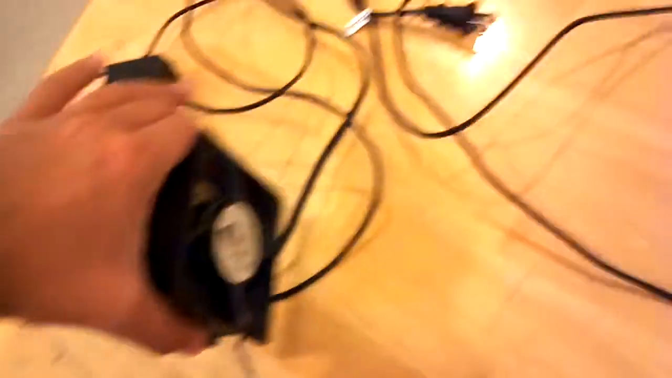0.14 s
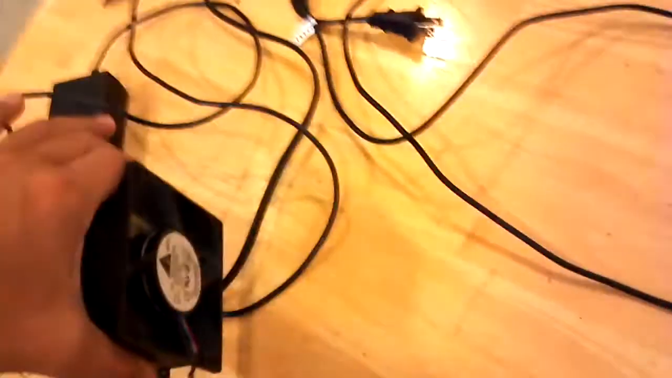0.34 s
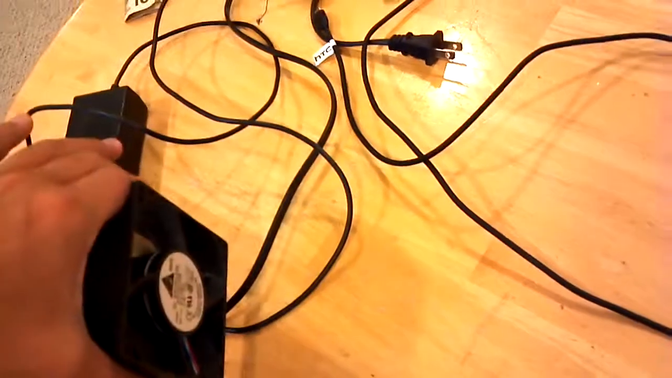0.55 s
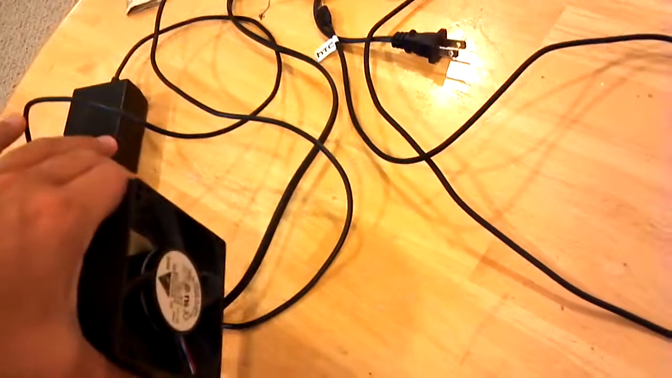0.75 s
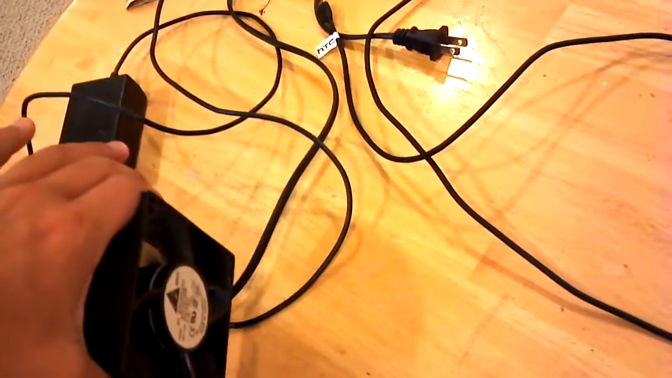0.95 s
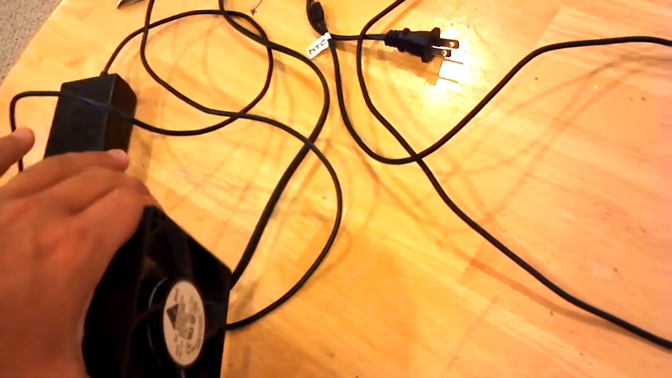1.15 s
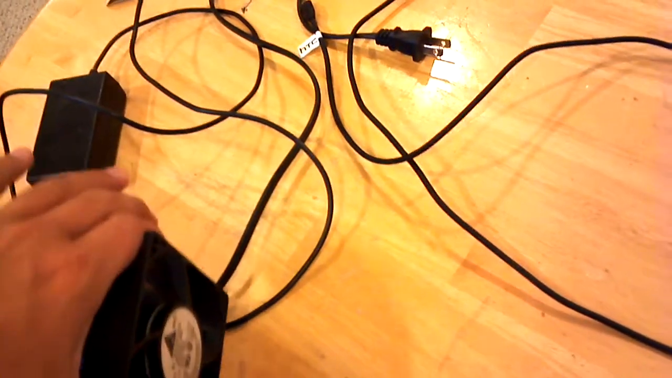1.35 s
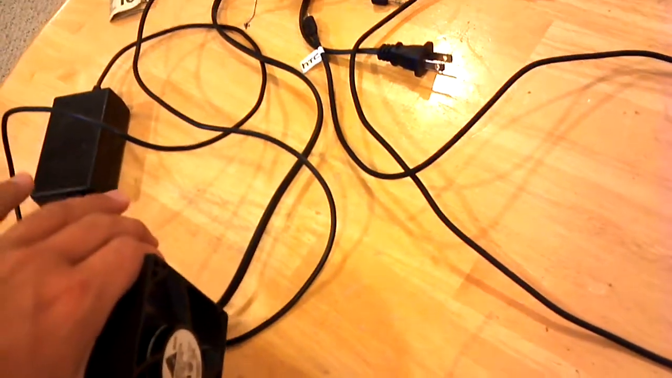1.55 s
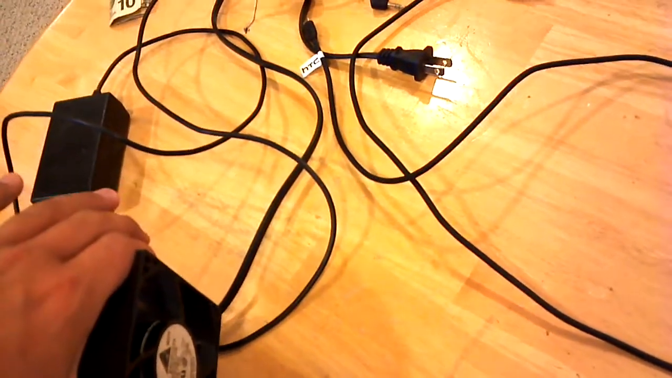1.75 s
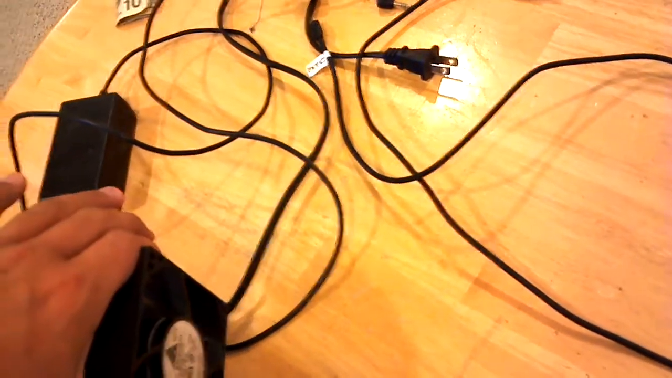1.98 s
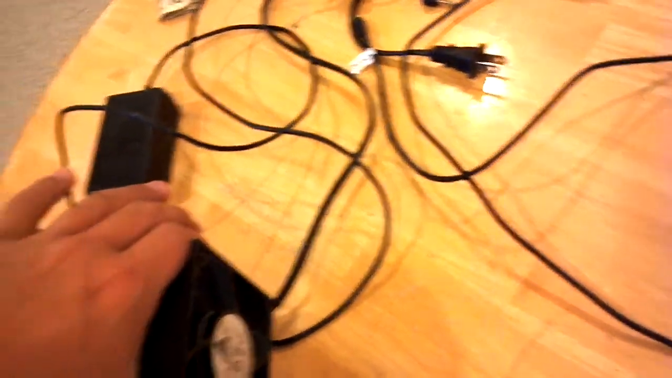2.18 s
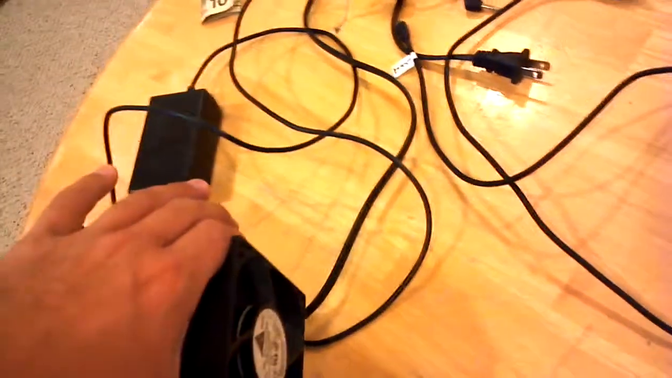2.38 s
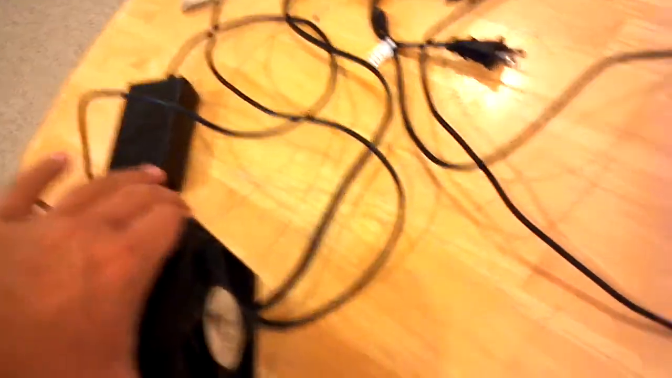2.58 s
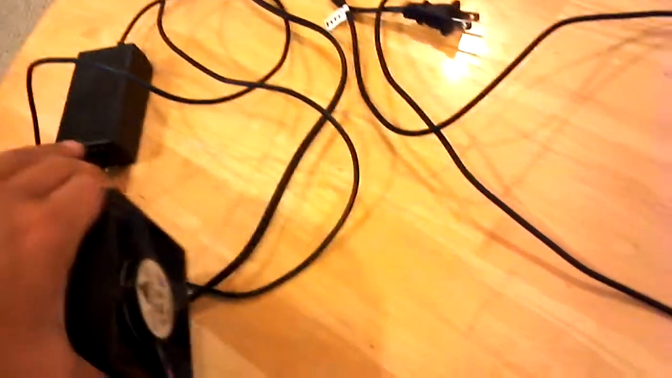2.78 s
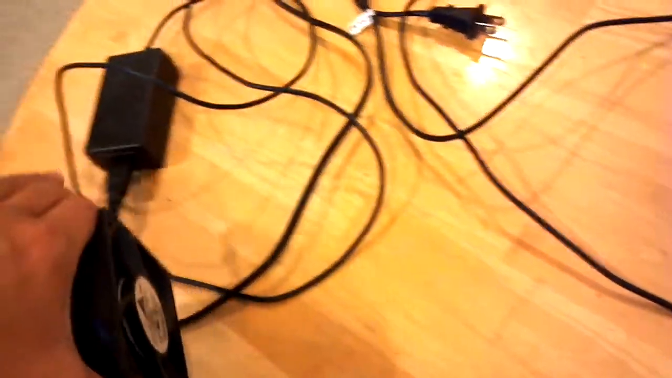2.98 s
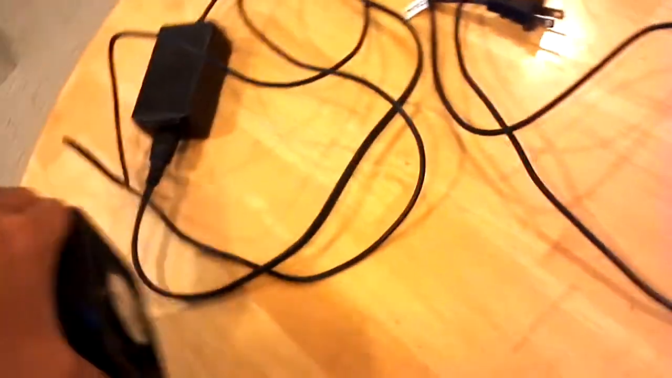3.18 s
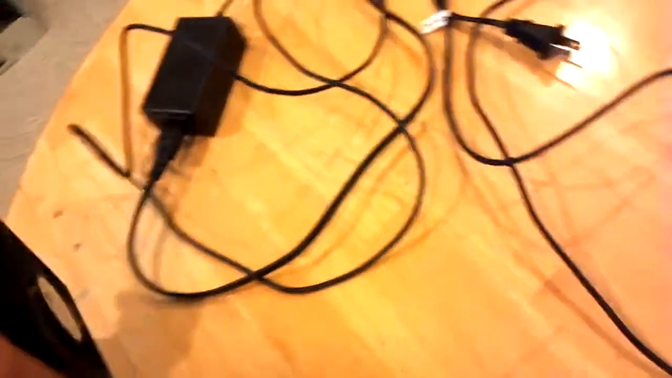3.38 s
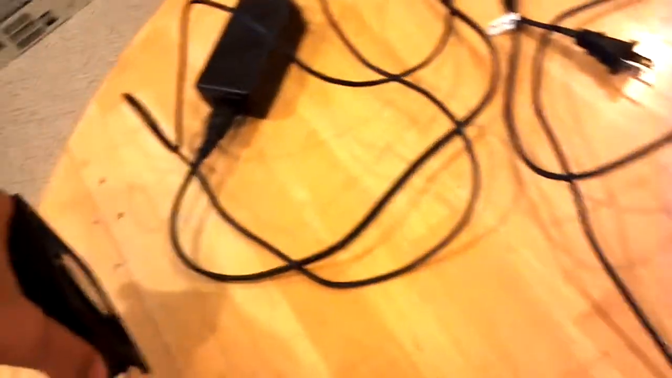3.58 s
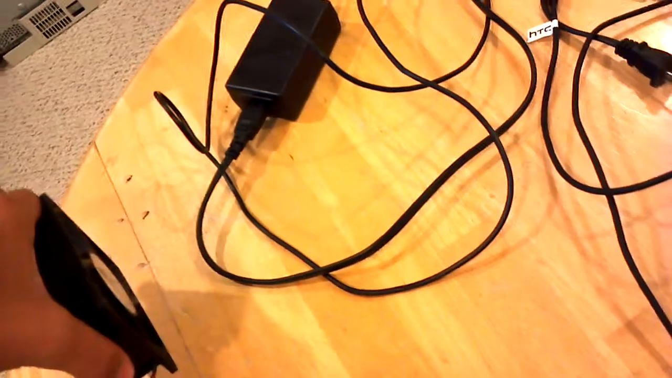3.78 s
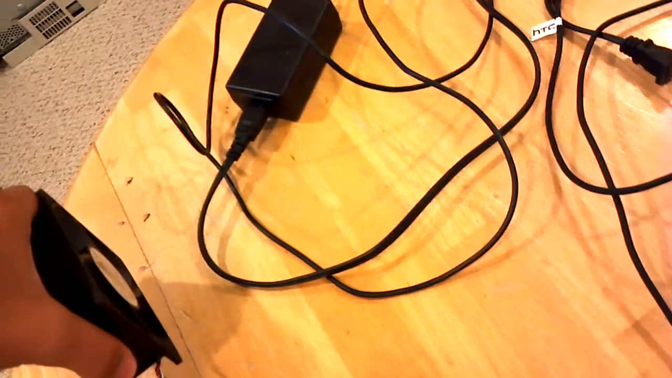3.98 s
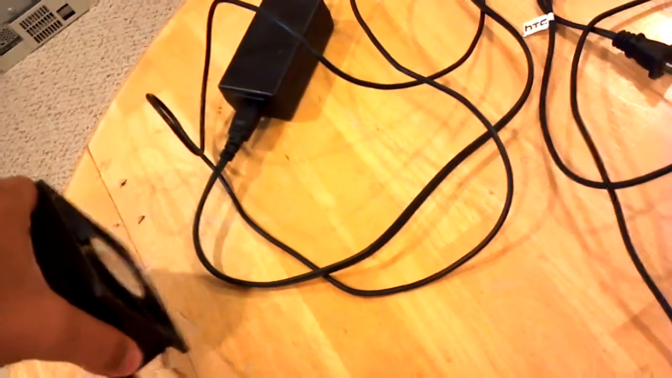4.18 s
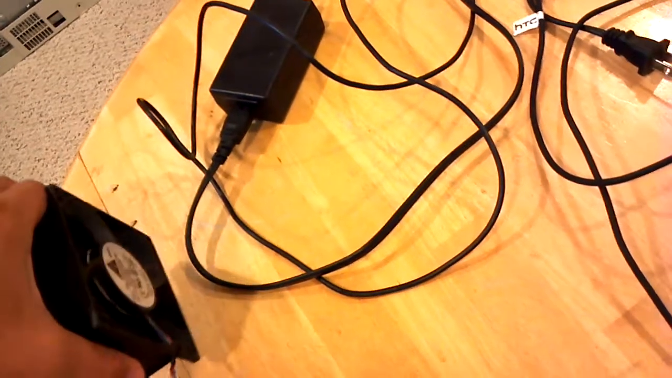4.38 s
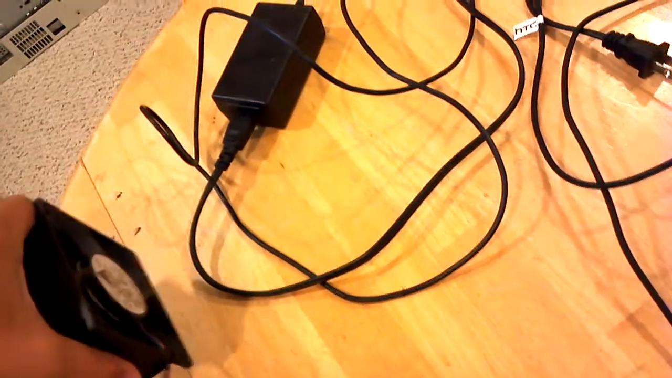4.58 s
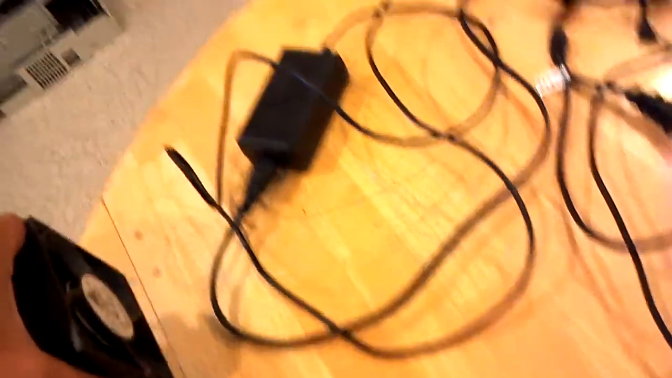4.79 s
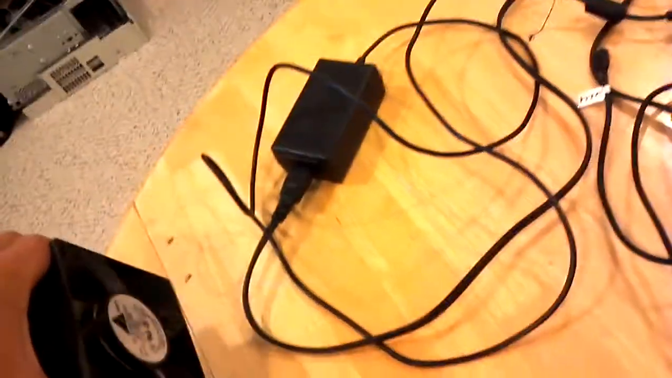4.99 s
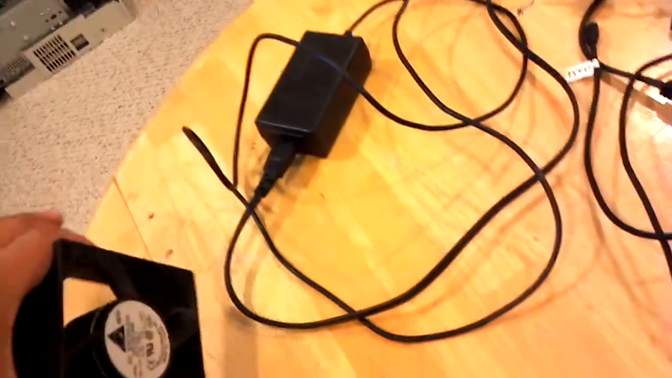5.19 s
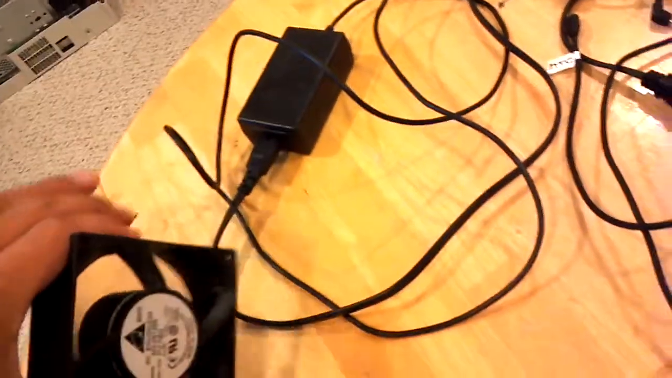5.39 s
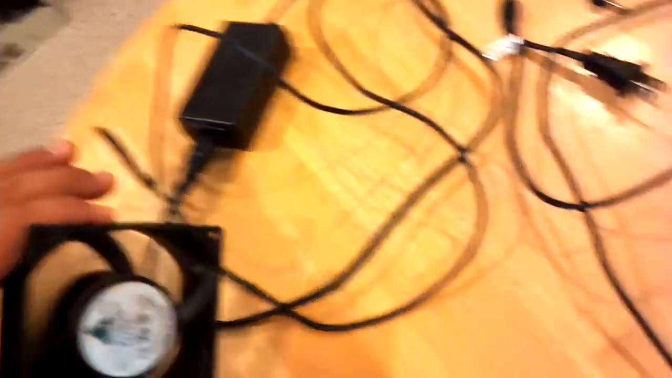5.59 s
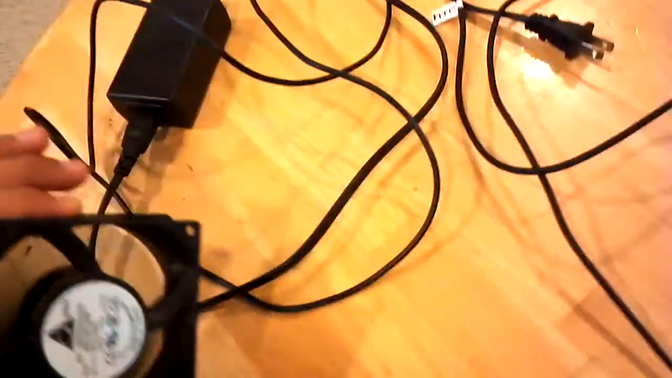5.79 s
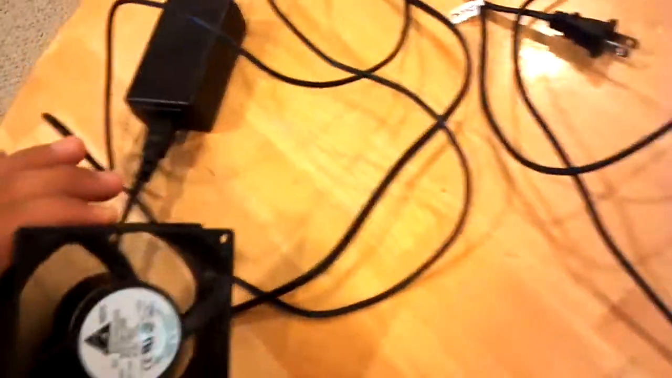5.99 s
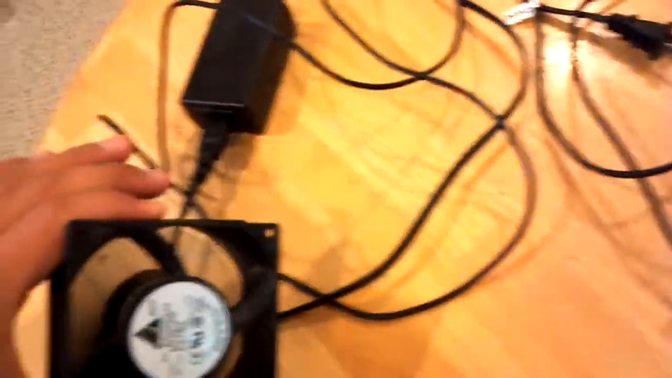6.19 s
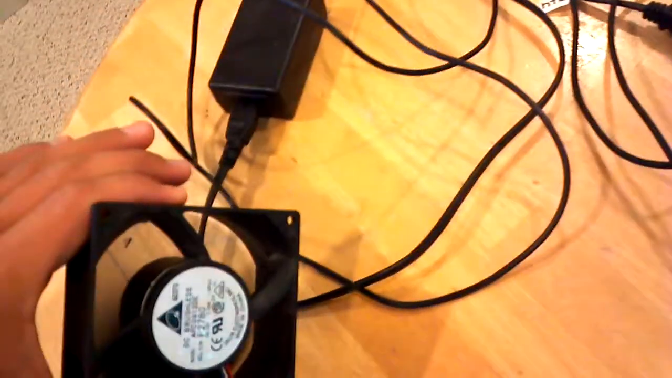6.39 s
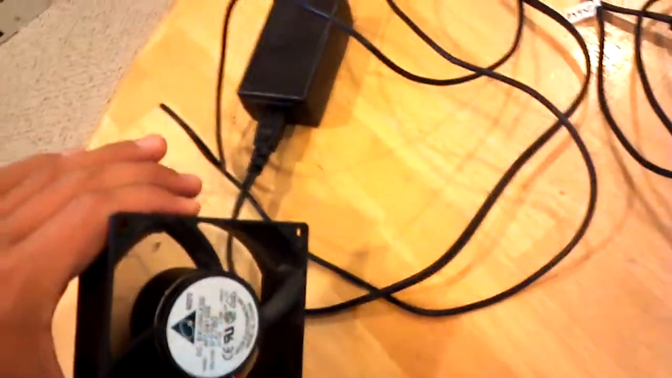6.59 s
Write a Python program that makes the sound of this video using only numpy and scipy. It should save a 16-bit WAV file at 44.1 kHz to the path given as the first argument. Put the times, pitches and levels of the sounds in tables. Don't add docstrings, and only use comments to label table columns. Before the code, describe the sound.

Close stereo pickup in a room: a little electric fan gathers speed, its blade hum and motor tones gliding up nearly an octave while rushing air swells strongly. The pitch then settles into a hollow, fluttering whine. In the last second, irregular low wind thumps and crackling overload one side, while automatic gain pushes the fan noise down.

```python
import sys
import numpy as np
from scipy import signal
from scipy.fft import rfft, irfft
from scipy.io import wavfile
from scipy.ndimage import uniform_filter1d

SR = 44100
rng = np.random.default_rng(int(sys.argv[2]) if len(sys.argv) > 2 else 0)


def volts(x):
    e = np.asarray(x, float) / 20
    return 10 ** e


def dump(signal):
    limited = np.clip(np.atleast_2d(signal).T, -1, 1)
    pcm = np.round(limited * 32767).astype(np.int16)
    wavfile.write(sys.argv[1], SR, pcm)


N = 293265
TIME = np.arange(N) / SR
HZ = np.fft.rfftfreq(N, 1 / SR)

# (time [s], pitch [Hz], level [dB])
WHISTLE = [(0, 12100, -71), (.2, 12650, -72), (.33, 13300, -67), (.45, 14200, -66), (.53, 15200, -65),
           (.6, 15900, -66), (.7, 16800, -95)]
# (time [s], pitch [Hz], peak [dB], length [s])
TICKS = [
    (.228, 14600, -48, .0001),
    (.314, 9800, -53, .0008),
    (.317, 5150, -45, .004),
]
# (time [s], speed [turns/s])
SHAFT_SPEED = [(0.0, 49.07), (1.0, 64.07), (2.0, 79.73), (3.0, 96.07), (3.15, 97.96), (3.45, 100.77),
               (3.75, 101.5), (4.05, 101.55), (4.65, 101.93), (5.25, 102.02), (5.55, 102.4), (6.65, 102.9)]
# (time [s], nearness [dB], facing [about -0.6 to 1.3], blade tone against the rush
# [dB], its octave against the rush [dB])
HAND = [(0, -0.35, -.3, 3.5, -3), (.3, -0.16, -0.26, 0.5, -8), (.6, -1.1, 0.4, -3.5, -9),
        (.9, 0, 0.47, -4.5, 1), (1.2, 0, 0.71, -6.5, -5.5), (1.5, 0.087, 0.71, -10, -5),
        (1.75, 1.9, .4, -5.5, -10.5), (2.1, -0.0059, 1.04, -15, -7), (2.3, 0.084, 0.95, -4.5, -8),
        (2.82, 0.25, 0.47, -13.5, -8.5), (3.0, -0.16, .5, 0, -5), (3.3, -0.29, 0.33, 0, -6),
        (3.55, 1.1, -0.22, -7.5, -4), (4.05, -0.27, -0.086, -9, -7.5), (4.5, 0.55, -0.16, -3, 2),
        (4.85, 0.52, -0.55, -8, -9.5), (5.35, -1.66, 1.3, 2.5, 0), (5.6, 1.1, 0.41, -8.5, -6.5)]
# (frequency [Hz], density [dB per Hz])
AIR_COLOUR = [(40, -33), (85, -4.5), (150, 2.5), (500, -3), (900, -3), (1500, 1), (2100, -0.5),
              (2600, -0.5), (3300, -0.5), (4300, 2), (5300, 1), (6500, -1.5), (9000, -5.5), (15000, -7.5)]
# (frequency [Hz], width [Hz], level [dB])
FRAME_NOTES = [(3100, 240, 2), (3680, 200, 3), (4630, 260, 7), (5800, 240, 8)]
# (slow level [dB], full-speed level [dB], change per unit of facing [dB])
HOLLOW_LEVELS = [(7, 1, 3), (-2, 2, -7), (-6.5, 0, -2.5), (-15, 2, -4.5)]
# (frequency [Hz], level [dB], likeness [0-1], lag [rad])
PORTS = [(58.8, -12.5, 0.85, .02), (305, 4.5, 1, 0.12), (785, 5, 0.9, 0.51), (900, 7, 0.9, 0.89),
         (1184, 4, 0.35, 0.48), (1770, 7, 0.89, 3.25), (2200, -1.8, 0.85, 4.19), (2865, -1, 1, 4.62),
         (2950, 5, 0.2, 7.2), (3780, -11, 0, 7.3), (4316, -2, 0.65, 9.52), (5800, -12.5, 0.96, 15.85),
         (8750, -10, 0.05, 22.3), (15000, -5, .15, 31.5)]
# (multiple [turns], level against the rush [dB])
FAINT_LINES = [(3, -27), (8, -24), (45, -17), (63, -28)]
# (frequency [Hz], width [Hz], level against the rush [dB])
HOUSING_MODES = [(830, 60, -23), (910, 46, -11.5), (1008, 72, -5), (1132, 18, -13), (1220, 66, -10.5)]
# (slow level against the rush
# [dB], full-speed level against the rush [dB], change per unit of facing [dB])
CHANGING_LEVELS = [(1, -19, 2.5), (-18.5, -24.5, 1.5), (-7.5, -18.5, 2.5), (-42, -20.5, 1), (-36, -23, -9),
                   (-33, -17, -2), (-13, -18.5, -1.5), (-19, -15, -5)]
# (time [s], thump peak [dB], crack against thump [dB], swing [Hz])
GUSTS = [(5.6972, 1, -28, 200), (5.704, -10, -5, 160), (5.7625, -1.5, -2.5, 266), (5.8459, -4.5, -27, 210),
         (5.8589, -2.5, -18, 151), (5.9401, -10, -6, 142), (5.9519, 3.5, -7.5, 154), (6.021, -9, -10, 310),
         (6.0515, -7.5, -17, 140), (6.0727, -3.5, -11, 172), (6.1042, -7, -10.5, 240),
         (6.119, -4, -4.5, 150), (6.1339, -5.5, -6.5, 320), (6.1567, -4, -2, 208), (6.171, -5.5, -6, 139),
         (6.2093, -7, -7, 198), (6.219, -5, -9.5, 180), (6.2408, -9.5, 0, 232), (6.2783, -2.5, -9, 149),
         (6.308, -4.5, -10, 200), (6.3337, -9, 4, 190), (6.3666, -0.5, -6, 280), (6.3785, -8, -2, 355),
         (6.4229, -13, -11, 219), (6.4473, -4.5, -14.5, 169), (6.4783, -5.5, -12, 294),
         (6.5137, -8.5, -18, 156), (6.5733, -12.5, -5, 340), (6.5945, -5.5, -5.5, 128),
         (6.6225, -3, -5, 272)]
# (delay [s], level against parent [dB])
SHED = [
    (-.009, -13),
    (.012, -6),
    (.023, -13.5),
    (.04, -18),
]
# (time [s], gain change [dB])
DUCK = [
    (5.697, -19),
    (5.954, -8),
    (6.13, -2.5),
]

SLOW_HZ, FULL_HZ = 49, 102
RUSH_DB = (-56, -25)  # (slow [dB], full speed [dB])
# (slow [dB], full speed [dB], change per unit of facing [dB])
BASS, MIDDLE, TOP = (-2.5, -15, 0.59), (3, -4.5, 2.3), (-10, -8, 4.9)
BLADE_ORDERS, MOTOR_ORDERS = (9, 18), (12, 16, 20)
CHANGING_ORDERS = (27, 5, 36, 11, 13, 14, 40, 54)
MOTOR_DB, MOTOR_FACING_DB = (-1.1, -2.5, 2), 4.5
HOUSING_FLOOR_DB = -31
SHED_JITTER_S, SHED_SCATTER_DB, SHED_CRACK_DB, SHED_HZ = 0.00494, 6.5, -15, 200
TOP_SPARED = 0.15
WIDEN_LAG, TOP_HZ = 17, 15850


def unit(x):
    return x / np.sqrt(np.mean(x ** 2))


def curve(table):
    s, *columns = np.transpose(table)
    return [np.interp(TIME, s, c) for c in columns]


def over(hz, table, index):
    rows = np.array(table)
    return np.interp(np.log(hz + 1), np.log(rows[:, 0]), rows[:, index])


def band(lo_hz, hi_hz, order=2):
    low_side = 1 + (lo_hz / (HZ + 1)) ** (2 * order)
    high_side = 1 + (HZ / hi_hz) ** (2 * order)
    return 1 / np.sqrt(low_side * high_side)


def walk(rate):
    k = int(SR / rate)
    steps = np.repeat(rng.standard_normal(N // k + 1), k)
    return 1.36 * uniform_filter1d(uniform_filter1d(steps, k), k)[:N]


def by_speed(speed, facing, slow_db, full_db, facing_db=0):
    return slow_db + (full_db - slow_db) * speed + facing_db * facing


def far_port(hz):
    return volts(over(hz, PORTS, index=1)) * np.exp(-1j * over(hz, PORTS, index=3))


def both_ports():
    near, other = rfft(rng.standard_normal((2, N)))
    alike = np.clip(over(HZ, PORTS, index=2), 0, 1)
    return np.array([near, far_port(HZ) * (alike * near + np.sqrt(1 - alike ** 2) * other)])


def hiss():
    return volts(-72) * irfft(rfft(rng.standard_normal((2, N))) * band(300, 11000, order=3), N)


def supply():
    hz, db = curve(WHISTLE)
    blur = walk(800) + 1j * walk(800)
    whistle = volts(db) * (blur * np.exp(2j * np.pi * np.cumsum(hz) / SR)).real
    for s, tick_hz, peak_db, length_s in TICKS:
        swell = np.exp(-((TIME - s) / length_s) ** 2)
        grain = 1 + 0.4 * walk(900)
        whistle = whistle + volts(peak_db) * swell * grain * np.sin(2 * np.pi * tick_hz * TIME)
    return whistle * np.array([[0.6], [1]])


def eddies():
    rows = list(GUSTS)
    chances = rng.uniform(-1, 1, (len(GUSTS), len(SHED), 4))
    for (s, thump_db, _, _), chance in zip(GUSTS, chances):
        for (later_s, weaker_db), (a, b, c, d) in zip(SHED, chance):
            rows.append((s + later_s + SHED_JITTER_S * a, thump_db + weaker_db + SHED_SCATTER_DB * b,
                         SHED_CRACK_DB + 8 * c, SHED_HZ * 1.94 ** d))
    return rows


def buffet():
    kicks, wake, edge = np.zeros((3, N))
    lead = 300
    age = np.arange(-lead, 1700) / SR
    for s, thump_db, crack_db, hz in eddies():
        at = np.arange(len(age)) + int(s * SR) - lead
        at, a = at[at < N], age[at < N]
        swing = np.cos(2 * np.pi * hz * a) * np.exp(-np.maximum(a * hz / 0.63, -a * hz / 0.072))
        cusp = volts(crack_db + 7) * np.exp(-np.abs(a) / 0.00013)
        push_or_pull = np.sign(rng.random() - 0.5)
        kicks[at] += push_or_pull * volts(thump_db) * (swing + cusp)
        wake[at] += volts(2 * thump_db) * np.exp(-np.maximum(a / 0.0048, -a * 1030.0))
        edge[at] += volts(2 * (thump_db + crack_db)) * np.exp(-np.maximum(a / 0.0016, -a / 0.0005))
    noise = rfft(rng.standard_normal((2, N)))
    rumble = irfft(noise * band(100, 470) / (1 + HZ / 700), N)
    snaps = rfft(np.tanh(rng.standard_normal(N)) * (rng.random(N) < 0.04))
    crackle = unit(irfft(snaps * band(620, 1200), N))
    crackle = crackle + volts(-13) * unit(irfft(snaps * band(2800, 4800), N))
    trail = np.sqrt(wake) * volts(-10) * unit(rumble[0])
    near = (kicks + trail + np.sqrt(edge) * volts(-10) * crackle) * volts(-0.5)
    near = 0.66 * np.tanh(near / 0.66)
    far = np.sqrt(wake) * volts(-27) * unit(rumble[1])
    wind_cut = signal.butter(3, [80, 4500], "band", fs=SR, output="sos")
    return signal.sosfilt(wind_cut, np.array([near, far]))


def rush(rush_db, bass_db, middle_db, top_db, hollow_db):
    air = both_ports() * volts(over(HZ, AIR_COLOUR, index=1))
    flutter = 0.5 * walk(4.92) + 0.5 * walk(14)
    ranges = [(30, 365, bass_db - 2.0), (550, 2090, middle_db - 5.0),
              (2770, 7400, -7.5), (7540, 12900, top_db - 3.5)]
    out = 0
    for lo_hz, hi_hz, db in ranges:
        part = unit(irfft(air * band(lo_hz, hi_hz, order=3), N))
        out = out + part * volts(db + flutter + 0.24 * walk(10))
    hollow = both_ports()
    for (hz, width, db), facing_db in zip(FRAME_NOTES, hollow_db):
        ring = unit(irfft(hollow / (1 + ((HZ - hz) / (width / 2)) ** 2), N))
        out = out + ring * volts(db + facing_db - 21 + 1.2 * walk(5))
    return out * volts(rush_db)


def housing_ring(hz):
    power = volts(2 * HOUSING_FLOOR_DB)
    for mode_hz, width, db in HOUSING_MODES:
        power = power + volts(2 * db) / (1 + ((hz - mode_hz) / (width / 2)) ** 4)
    return 10 * np.log10(power)


def tone_levels(shaft_hz, speed, facing, blade_db):
    motor = [db + MOTOR_FACING_DB * facing + housing_ring(order * shaft_hz)
             for order, db in zip(MOTOR_ORDERS, MOTOR_DB)]
    changing = [by_speed(speed, facing, *row) for row in CHANGING_LEVELS]
    return list(zip(BLADE_ORDERS + MOTOR_ORDERS + CHANGING_ORDERS, blade_db + motor + changing))


def whine(shaft_hz, rush_db, strong):
    turn = 2 * np.pi * np.cumsum(shaft_hz * (1 + 0.000556 * walk(9))) / SR
    out = 0
    for order, db in strong + FAINT_LINES:
        hz = order * shaft_hz
        far = far_port(hz)
        late = np.exp(-2j * np.pi * hz * WIDEN_LAG / SR)
        heard = np.sqrt((abs(1 - far * late) ** 2 + abs(far - late) ** 2) / 2)
        shake = volts(db + 0.83 * walk(16) + 2.2 * walk(35)) * np.exp(0.3j * walk(20))
        phase = order * turn + 2 * np.pi * rng.random()
        line = np.sqrt(2) * shake * np.exp(1j * phase) / heard
        out = out + np.array([line.real, (far * line).real])
    return out * volts(rush_db)


def scene():
    shaft_hz = curve(SHAFT_SPEED)[0]
    speed = (shaft_hz - SLOW_HZ) / (FULL_HZ - SLOW_HZ)
    near_db, facing, *blade_db = curve(HAND)
    duck_db = sum(db * np.clip((TIME - s) / 0.0043, 0, 1) for s, db in DUCK)
    rush_db = by_speed(speed, 0, *RUSH_DB) + near_db + duck_db
    bass_db, middle_db, top_db = [by_speed(speed, facing, *row) for row in (BASS, MIDDLE, TOP)]
    hollow_db = [by_speed(speed, facing, *row) for row in HOLLOW_LEVELS]
    fan = rush(rush_db, bass_db, middle_db, top_db - TOP_SPARED * duck_db, hollow_db)
    fan = fan + whine(shaft_hz, rush_db, tone_levels(shaft_hz, speed, facing, blade_db))
    return hiss() + supply() + buffet() + fan


def roll_off(x):
    return signal.sosfilt(signal.butter(12, 16060, fs=SR, output="sos"), x)


def record(dry):
    late = np.pad(dry[::-1], ((0, 0), (WIDEN_LAG, 0)))[:, :N]
    wide = dry - 0.997 * late
    wide = irfft(rfft(wide) * np.clip((TOP_HZ - HZ) / 60, 0, 1), N)
    wide = np.clip(wide, -0.95, 0.95)
    return roll_off(wide)


dry = scene()
out = record(dry)
dump(out)
```